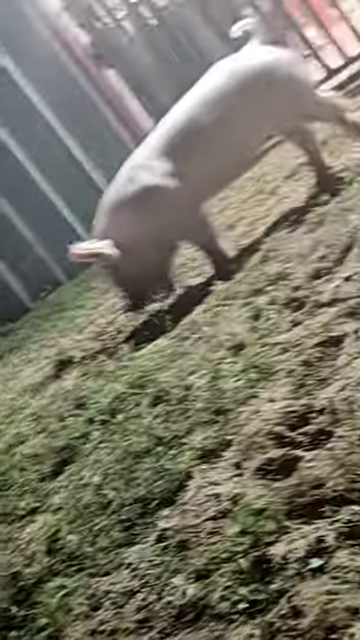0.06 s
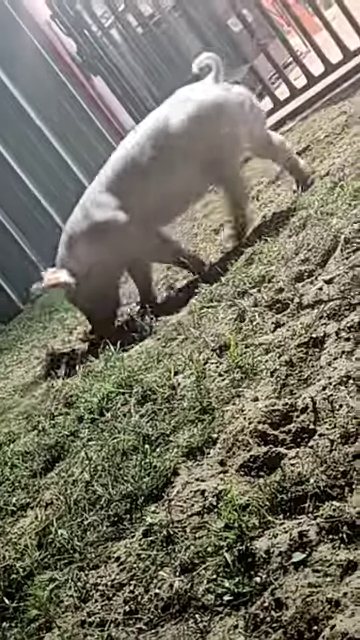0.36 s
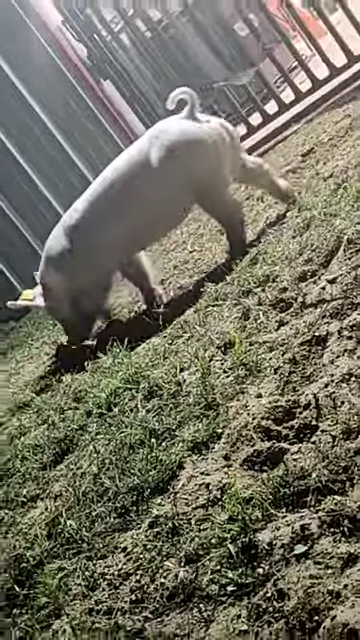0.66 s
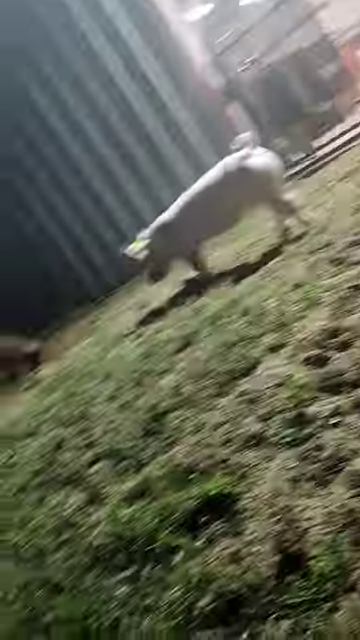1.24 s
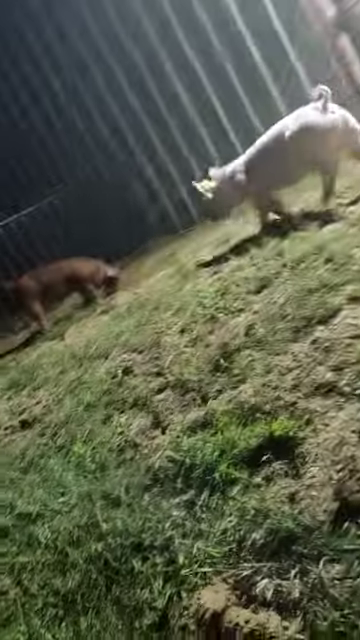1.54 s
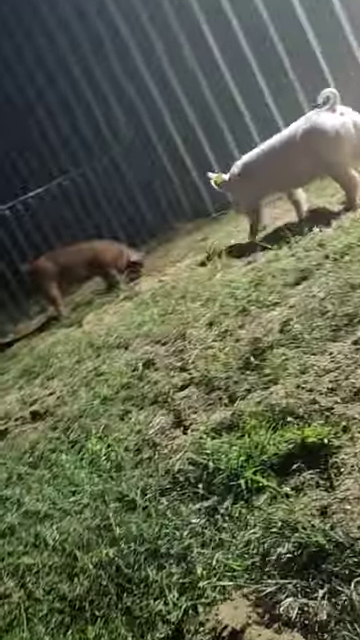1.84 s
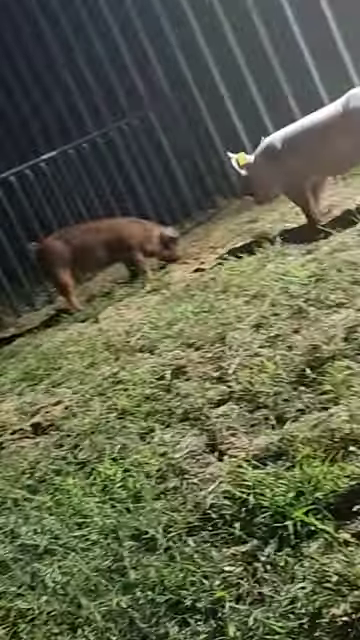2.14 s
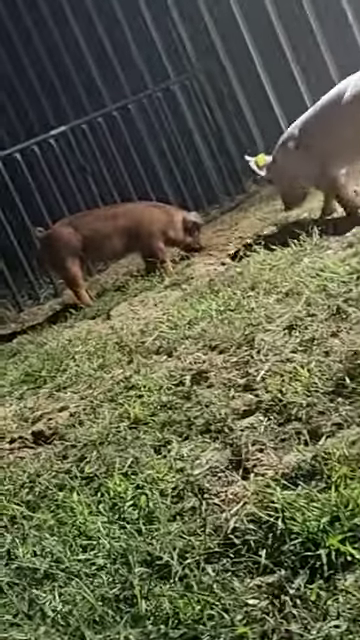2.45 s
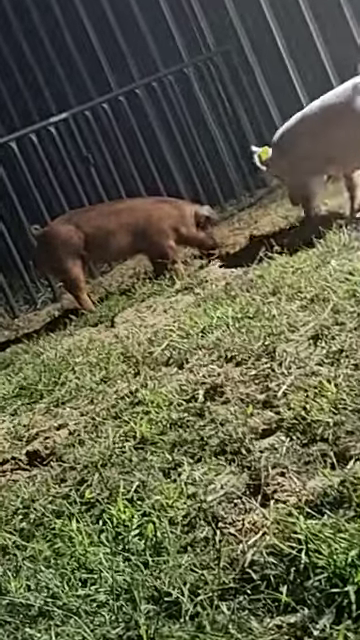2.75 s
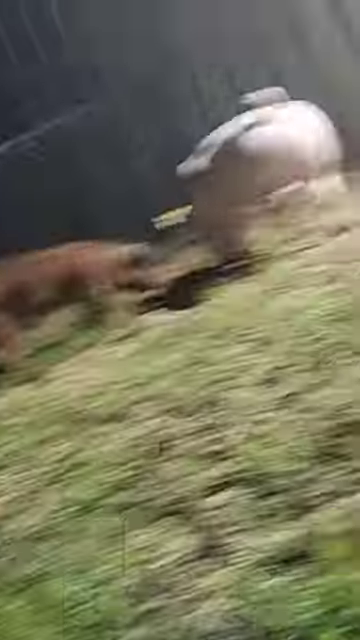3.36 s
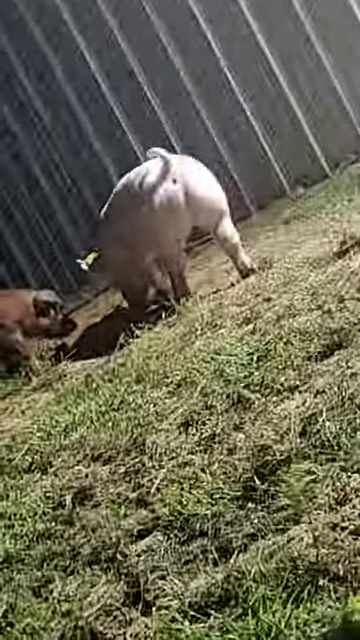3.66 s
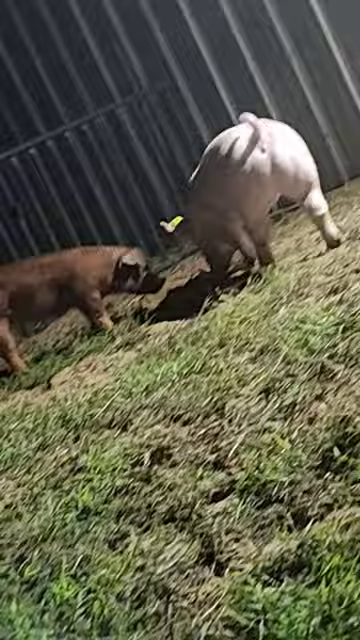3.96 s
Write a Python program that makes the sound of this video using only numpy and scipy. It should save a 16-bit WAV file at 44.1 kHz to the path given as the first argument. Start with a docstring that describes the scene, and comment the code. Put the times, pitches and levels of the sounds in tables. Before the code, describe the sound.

Barn fans hum and rumble steadily while pigs rustle and crackle through dry grass.

```python
"""A steady hum and rumble comes first: a machine, barn fans by the sound, behind a pig pen at night.
In front of the stereo microphones two pigs root in dry grass beside the metal barn. Blades rustle and
crackle under snouts and feet, trotters scuff the soil, stalks snap, and one pig snuffles in the dirt.
A loose metal fitting, off to the right, rings in two short bouts of clinks.
A cricket chirps faintly, and two faint calls come from far off."""
import sys
import numpy as np
from scipy import signal
from scipy.fft import rfft, irfft
from scipy.io import wavfile

SR = 44100
rng = np.random.default_rng(int(sys.argv[2]) if len(sys.argv) > 2 else 0)


def to_wav(s):
    """Save 16-bit WAV."""
    ch = np.atleast_2d(s).T  # columns
    pcm = np.round(np.clip(ch, -1, 1) * 32767)  # PCM
    wavfile.write(sys.argv[1], SR, pcm.astype(np.int16))


N = 176400
TIME = np.arange(N) / SR
FREQS = np.maximum(np.fft.rfftfreq(N, 1 / SR), 1)

# partials of the motor hum: pitch_hz, level_db, left_over_right_db
HUM_PARTIALS = [(59.8, -48.5, 4), (120.1, -29, -1.9), (238, -49, 4), (360.4, -65, -0.5)]
# tone of the fans' rumble and of their rushing air: frequency_hz, relative_db
RUMBLE_SPECTRUM = [(15, -35), (23, -31.5), (27, -10), (42, -6.5), (55, -2.5), (71, -0.5), (77, -13),
                   (85, -4.5), (92, 1), (110, 1.5), (128, -6.5), (141, 1.5), (155, -3.5), (172, -3),
                   (188, -9), (207, -5.5), (220, -9), (260, -12), (310, -16.5), (340, -24.5), (450, -29),
                   (800, -63.5)]
AIR_SPECTRUM = [(100, -9.5), (250, -4), (400, -0.5), (490, -3), (570, -1.5), (720, -9.5), (1020, -7.5),
                (1400, -15), (1700, -13), (1900, -16), (2300, -14), (2750, -19.5), (4000, -22.5),
                (6000, -38), (10000, -43), (15000, -40)]
# how alike fan and snout noise are at the two microphones: frequency_hz, likeness (1 or more is mono)
MIC_LIKENESS = [(60, 1.1), (150, 0.9), (250, 0.7), (370, 0.75), (520, 0.7), (800, 0.36), (2000, 0)]
# lean of the fan noise and of the grass and stalks: frequency_hz, left_over_right_db
FAN_BALANCE = [(100, 1), (200, -1), (400, 5.5), (550, -2.5), (720, 6), (1050, -0.5), (2100, 4.5), (3000, 0),
               (4200, -1), (7000, 1.5), (10000, 3.5), (14000, -2)]
GROUND_BALANCE = [(2000, 1), (4200, -2), (7000, -0.5), (10000, 4), (12000, -3), (14500, -8)]
# rise and fall of the grass's rustle and of its fine crackle: time_s, relative_db
RUSTLE_ENVELOPE = [(0, -64), (.10, -61.5), (.17, -50.5), (.28, -54.5), (.38, -64), (.52, -63.5), (.70, -63),
                   (.86, -56), (.94, -62.5), (1.13, -56.5), (1.40, -60.5), (1.62, -67), (1.77, -59),
                   (1.87, -70), (2.15, -60.5), (2.26, -68), (2.36, -65.5), (2.70, -64), (3.0, -68),
                   (3.15, -67), (3.26, -60), (3.38, -71), (3.45, -62.5), (3.6, -66.5), (3.71, -58),
                   (3.8, -67.5), (4, -74)]
CRACKLE_ENVELOPE = [(0, -73), (.09, -75), (.18, -58), (.40, -74), (.52, -57), (.71, -70), (.765, -48),
                    (.81, -63), (.95, -76), (1.14, -66), (1.23, -72), (1.38, -56.5), (1.62, -64.5),
                    (1.80, -57), (1.87, -63), (1.95, -59), (2.02, -63), (2.15, -54), (2.25, -63),
                    (2.34, -54.5), (2.66, -58), (2.86, -54), (3.02, -56), (3.15, -65), (3.23, -56),
                    (3.36, -71), (3.70, -73), (4, -77)]
# tone of brushing blades, crackling blades and scuffed soil: frequency_hz, relative_db
RUSTLE_SPECTRUM = [(800, -8), (2000, -5.5), (4000, 3), (6000, -3), (8000, -3.5), (10000, -7.5), (13000, -4),
                   (15500, -8)]
CRACKLE_SPECTRUM = [(2000, -25), (5000, -14.5), (10000, -13), (12000, -9), (14000, -1.5), (15500, -2.5)]
SCUFF_SPECTRUM = [(500, -14), (1400, 3), (2700, 4.5), (4000, -11), (6000, -12), (15000, -18)]
# trotters scuff the soil: start_s, level_db, decay_s
SCUFFS = [(.04, -50.5, 0.022), (2.96, -54, .03), (3.42, -51, 0.037), (3.73, -54, 0.016)]
# single stalks snap: start_s, tick_db, crack_db
SNAPS = [(.158, -44, -43), (1.4353, -38, -32), (1.787, -44, -43), (1.987, -38, -50), (2.046, -35, -48),
         (2.398, -28, -46), (2.511, -40, -54), (2.7508, -21, -29.5), (2.7553, -27, -34), (2.8858, -25, -58),
         (2.9278, -26.5, -44), (3.1986, -34, -58), (3.737, -44, -39), (3.746, -39, -46)]
# whole tufts crunch: start_s, level_db, decay_s
CRUNCHES = [(.749, -50, .03), (.772, -45, .008), (2.751, -38, .016), (2.77, -50.5, 0.055),
            (2.882, -47, 0.0088), (2.983, -51, .01), (3.255, -55, 0.013)]
# tone of a snap's bright tick, its duller crack, and a tuft's crunch: frequency_hz, relative_db
TICK_SPECTRUM = [(2000, -25), (5000, -18), (10000, -6), (12000, 2), (14000, 9.5), (15500, -2)]
CRACK_SPECTRUM = [(600, -24), (1800, -8), (3100, -4), (3900, 4), (6000, -3), (9000, -16), (12000, -11)]
CRUNCH_SPECTRUM = [(600, -16), (1800, 6), (4000, 0.5), (6000, -0.5), (10000, -3), (12000, 3.5), (14000, 10),
                   (15500, -3.5)]
# the cricket's chirps: centre_s, level_db
CHIRPS = [(.195, -63), (.352, -58), (.508, -58), (.82, -56.5), (1.29, -64)]
# touches on the loose fitting: start_s, strength_db
CLINKS = [(.752, -47.5), (0.779, -60), (2.449, -60), (2.463, -54), (2.53, -65)]
# ringing modes of the fitting: pitch_hz, relative_db, t60_s
FITTING_MODES = [(3940, -11, .1), (4113, 2.5, 0.27), (4150, -6.5, 0.4), (4260, -6, 0.1), (8270, -20, 0.14),
                 (11300, -11, 0.15), (13280, -20, .3)]
# the two puffs of one snuffle: start_s, level_db, decay_s
SNUFFLE_PUFFS = [(1.277, -42, 0.028), (1.325, -44, .055)]
# tone of a snout in the dirt: frequency_hz, relative_db
SNUFFLE_SPECTRUM = [(150, -19), (380, -8), (520, 3.5), (590, -4), (660, -2.5), (830, -14), (1070, -5.5),
                    (1300, -14.5), (3000, -26), (8000, -50)]
# notes of the far calls, the last two sounding together: centre_s, pitch_hz, level_db
FAR_CALL_NOTES = [(2.12, 920, -53.5), (2.40, 840, -53), (2.41, 1360, -64)]

LEFT_LEAD_S = .00042  # sound from the left reaches the left microphone this much sooner


def from_db(db):
    """Decibels to gain."""
    return 10 ** (np.asarray(db) / 20)


def unit_rms(x):
    """Scale to rms 1."""
    return x / np.sqrt(np.mean(x ** 2) + 1e-20)


def over_hz(points):
    """Read rows of (frequency_hz, value) along a log-frequency axis."""
    hz, value = np.transpose(points)
    return np.interp(np.log(FREQS), np.log(hz), value)


def envelope(rows):
    """Rows of (time_s, level_db) as a gain in time."""
    return from_db(np.interp(TIME, *np.transpose(rows)))


def pan(left_over_right_db):
    """Left and right gains for a level difference between the microphones."""
    return from_db(np.array([[.5], [-.5]]) * left_over_right_db)


def colour(x, spectrum, balance=None):
    """Give a stereo signal a spectrum and a balance, keeping the power of white input."""
    gain = from_db(over_hz(spectrum)) * pan(over_hz(balance) if balance else 0)
    return irfft(rfft(x) * unit_rms(gain), N)


def drift(rate_hz):
    """A random wander of rms 1, mostly slower than rate_hz."""
    return unit_rms(irfft(rfft(rng.standard_normal(N)) / (1 + (FREQS / rate_hz) ** 2), N))


def from_left(x):
    """A source on the left: the right microphone hears it a little later."""
    delayed = irfft(rfft(x) * np.exp(-2j * np.pi * FREQS * LEFT_LEAD_S), N)
    return np.array([x, delayed])


def stereo_noise():
    """White noise, alike at both microphones in the bass and unrelated in the treble."""
    mid, side = rfft(rng.standard_normal((2, N)))
    alike = np.clip(over_hz(MIC_LIKENESS), -1, 1)
    return unit_rms(irfft(np.sqrt(1 + alike) * mid + np.sqrt(1 - alike) * side * [[1], [-1]], N))


def grains(per_s, spread_db, shared_power=0.16):
    """Tiny random fractures of uneven size; a share reaches both microphones, left first."""
    sizes = from_db(spread_db * np.minimum(rng.exponential(1, N), 5))
    breaks = rng.random(N) < per_s / SR
    pulses = breaks * sizes * rng.standard_normal((3, N))  # left, right, shared
    return unit_rms(np.sqrt(1 - shared_power) * pulses[:2] + np.sqrt(shared_power) * from_left(pulses[2]))


def bursts(rows, attack_s):
    """Envelope of (start_s, level_db, decay_s) events: a straight rise, then a dying tail."""
    power = 0
    for start_s, db, decay_s in rows:
        age = np.maximum(TIME - start_s, 0)
        rise = np.minimum(age / attack_s, 1)
        tail = np.exp(-np.maximum(age - attack_s, 0) / decay_s)
        power += (from_db(db) * rise * tail) ** 2
    return np.sqrt(power)


def wavering_note(centre_s, hz, db, half_length_s, waver_hz):
    """A short rounded note whose pitch wavers differently at each microphone."""
    pitch_hz = hz + waver_hz * np.array([drift(97), drift(100)])
    phase = 2 * np.pi * np.cumsum(pitch_hz, axis=1) / SR
    swell = np.exp(-((TIME - centre_s) / half_length_s) ** 2)
    return from_db(db) * swell * np.sqrt(2) * np.sin(phase)


def fans(waver_db=0.45, waver_rad=0.13, rumble_db=-34.5, air_db=-47.5, direct_power=0.2):
    """Behind the pen, motors hum over rumble and rushing air, some of it straight from the left."""
    hum = 0
    for hz, db, pan_db in HUM_PARTIALS:
        phase = 2 * np.pi * (hz * TIME + rng.random()) + waver_rad * drift(2.7)
        hum += pan(pan_db) * from_db(db + waver_db * drift(5.2)) * np.sqrt(2) * np.sin(phase)
    rumble = from_db(rumble_db) * colour(stereo_noise(), RUMBLE_SPECTRUM, FAN_BALANCE)
    diffuse = np.sqrt(1 - direct_power) * stereo_noise()
    direct = np.sqrt(direct_power) * from_left(rng.standard_normal(N))
    air = from_db(air_db) * colour(diffuse + direct, AIR_SPECTRUM, FAN_BALANCE)
    return hum + rumble + air


def grass(crackle_gain_db=1):
    """Down in the pen, blades brush past each other and the dry ones crackle."""
    rustle = colour(grains(per_s=14000, spread_db=1.5), RUSTLE_SPECTRUM, GROUND_BALANCE)
    crackle = colour(grains(per_s=5000, spread_db=3), CRACKLE_SPECTRUM, GROUND_BALANCE)
    crackle *= from_db(crackle_gain_db)
    return envelope(RUSTLE_ENVELOPE) * rustle + envelope(CRACKLE_ENVELOPE) * crackle


def trotters():
    """Feet drag briefly through gritty soil."""
    grit = colour(grains(per_s=5000, spread_db=-0.5), SCUFF_SPECTRUM)
    return bursts(SCUFFS, attack_s=0.011) * grit


def snap_pulses(starts_s, levels_db, tail_db=-12.5, decay_s=0.0021):
    """Each break is one sharp pulse, left microphone first, with a brief splintering tail."""
    tails = [(start_s, db + tail_db, decay_s) for start_s, db in zip(starts_s, levels_db)]
    pulses = bursts(tails, attack_s=0.00036) * rng.standard_normal((2, N))
    for side, lag_s in enumerate((0, LEFT_LEAD_S)):
        pulses[side, ((starts_s + lag_s) * SR).astype(int)] += from_db(levels_db)
    return pulses


def stalks():
    """Single stalks snap, each with a bright tick and a duller crack."""
    starts_s, tick_db, crack_db = np.transpose(SNAPS)
    ticks = colour(snap_pulses(starts_s, tick_db), TICK_SPECTRUM, GROUND_BALANCE)
    cracks = colour(snap_pulses(starts_s, crack_db), CRACK_SPECTRUM, GROUND_BALANCE)
    return ticks + cracks


def cricket(pitch_hz=3710):
    """A cricket gives faint, short chirps around one high pitch."""
    return sum(wavering_note(centre_s, pitch_hz, db, half_length_s=0.015, waver_hz=110)
               for centre_s, db in CHIRPS)


def tufts():
    """Whole tufts crunch in a dying shower of fractures."""
    fractures = bursts(CRUNCHES, attack_s=0.0028) * grains(per_s=30000, spread_db=5.5)
    return colour(fractures, CRUNCH_SPECTRUM, GROUND_BALANCE)


def fitting(pan_db=-8.5, chatter_depth=0.3):
    """Off to the right, each touch sets a small metal part ringing; it chatters as it rings."""
    ring = np.zeros((2, N))
    for start_s, strength_db in CLINKS:
        age = np.maximum(TIME - start_s, 0)
        for hz, mode_db, t60_s in FITTING_MODES:
            phase = 2 * np.pi * (hz * age + rng.random((2, 1)))
            decay = (age > 0) * np.exp(-np.log(1000) * age / t60_s)
            ring += from_db(strength_db + mode_db) * decay * np.sin(phase)
    chatter = 1 + chatter_depth * drift(220)
    return pan(pan_db) * ring * chatter


def snout():
    """A pig blows short, dull puffs into the soil."""
    return bursts(SNUFFLE_PUFFS, attack_s=0.013) * colour(stereo_noise(), SNUFFLE_SPECTRUM)


def far_calls():
    """Two faint animal calls carry in from far off in the night."""
    return sum(wavering_note(centre_s, hz, db, half_length_s=0.048, waver_hz=29.9)
               for centre_s, hz, db in FAR_CALL_NOTES)


def scene():
    """The pen as the microphones face it, with the fans behind."""
    return (fans() + grass() + trotters() + stalks() + cricket() + tufts()
            + fitting() + snout() + far_calls())


def record(dry):
    """A steep low-pass takes the very top off both channels."""
    cutoff_hz = 15550
    return signal.sosfilt(signal.ellip(10, .2, 70, cutoff_hz, fs=SR, output="sos"), dry)


dry = scene()
out = record(dry)
to_wav(out)
```